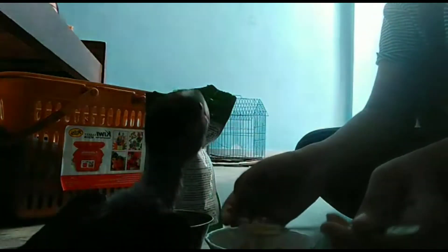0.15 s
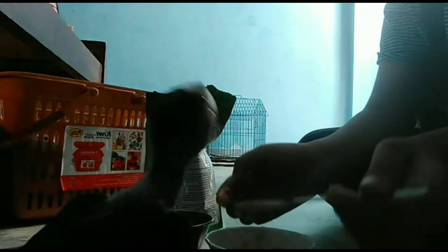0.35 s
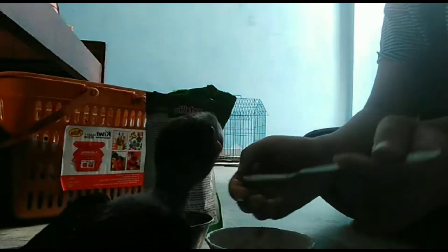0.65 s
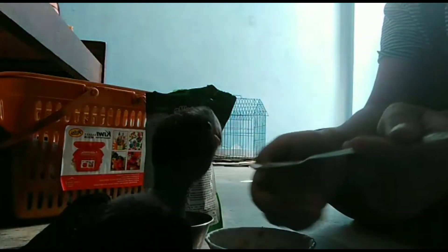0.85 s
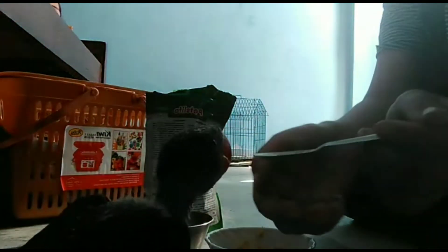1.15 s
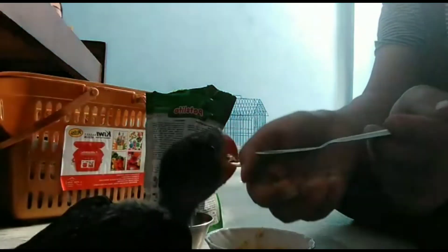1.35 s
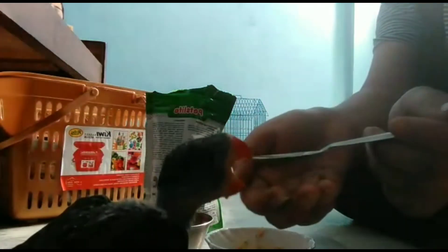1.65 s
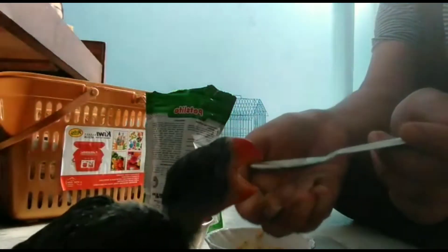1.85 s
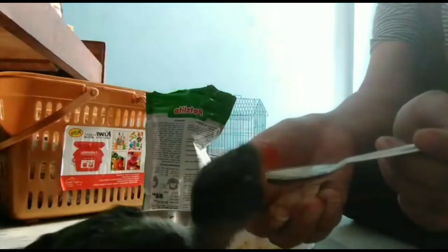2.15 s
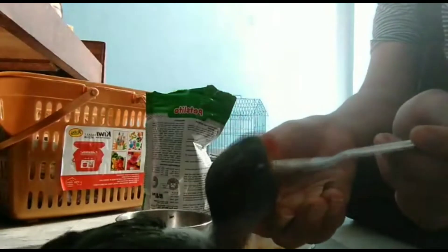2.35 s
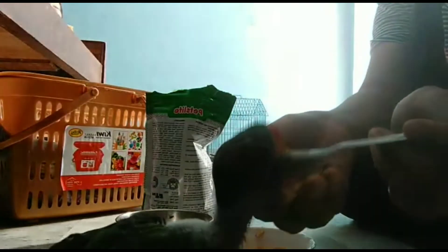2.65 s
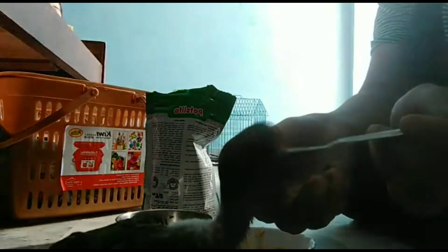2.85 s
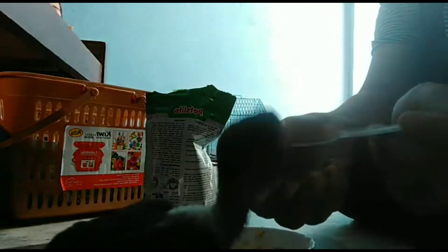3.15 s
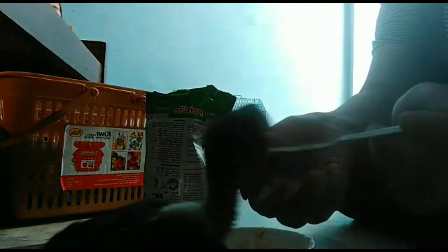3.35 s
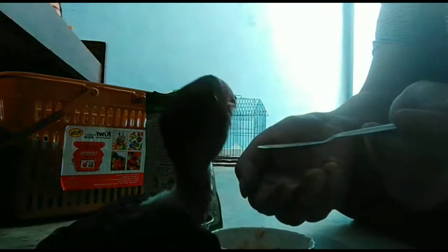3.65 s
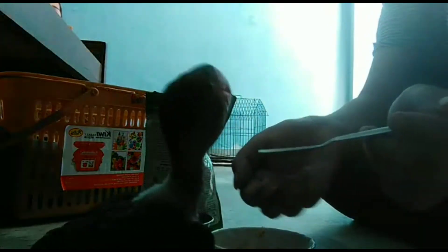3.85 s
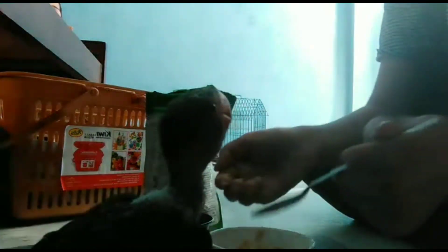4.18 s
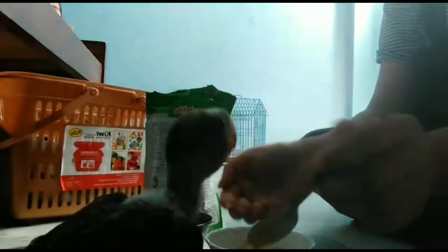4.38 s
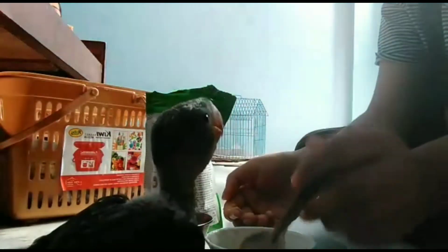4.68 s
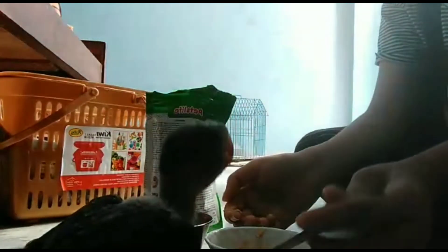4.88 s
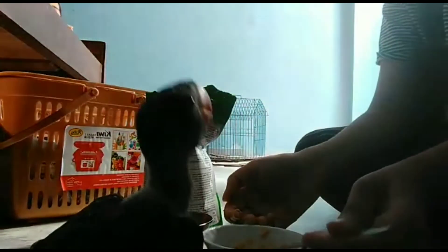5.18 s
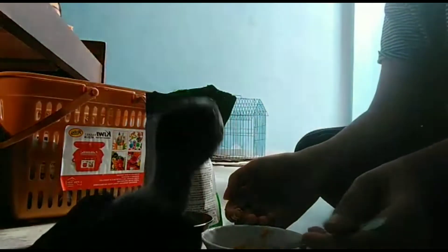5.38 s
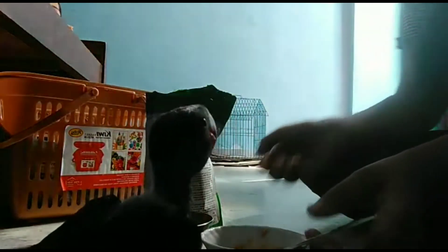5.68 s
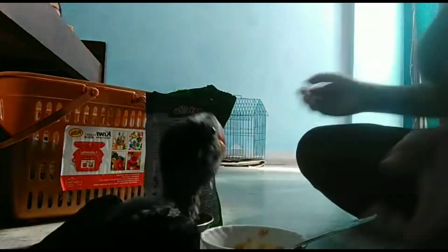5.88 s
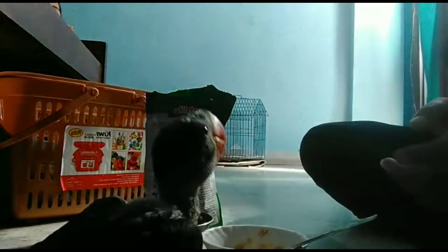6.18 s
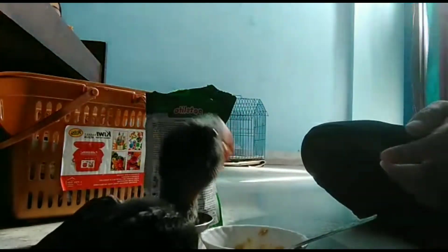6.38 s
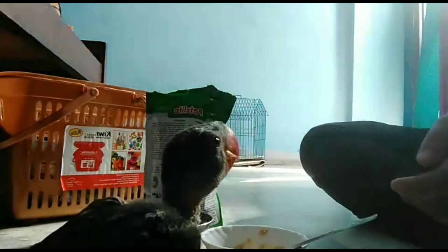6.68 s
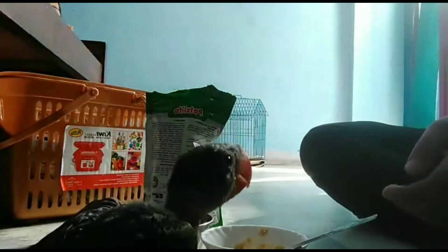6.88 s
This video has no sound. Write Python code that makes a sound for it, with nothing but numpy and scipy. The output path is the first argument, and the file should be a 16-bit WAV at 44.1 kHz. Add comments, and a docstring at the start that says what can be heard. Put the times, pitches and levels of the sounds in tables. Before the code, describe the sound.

A parrot chick close to the microphone ends one rasping squawk, then soon gives another, shrill and harsh, dropping in pitch. Its beak ticks lightly against a metal spoon. The spoon scrapes briefly, and the chick squawks once more, with tiny croaks before and after. Soft brushing of feathers and a sleeve follows. Dull floor bumps, low shuffling and faint background noise run underneath in a small, slightly echoing room.

```python
"""The rasping tail of a parrot chick's squawk, then two whole squawks, in a small quiet room.
Its syrinx buzzes through throat and beak: a clear arch breaks into a rasp as the pitch steps down.
Short croaks surround the last call. The chick is spoon-fed: the beak ticks, the spoon rings and
scrapes, feathers and sleeves brush. Dull floor bumps, shuffling rumble and room noise lie beneath;
rumble, rubbing, room noise and echo sink under each call."""
import sys
import numpy as np
from scipy import signal
from scipy.fft import rfft, irfft, next_fast_len
from scipy.io import wavfile
from scipy.ndimage import uniform_filter1d

SR = 44100
rng = np.random.default_rng(int(sys.argv[2]) if len(sys.argv) > 2 else 0)


def pcm_store(signal):
    """Save signal as 16-bit PCM."""
    levels = np.round(np.clip(np.atleast_2d(signal), -1, 1) * 32767)
    wavfile.write(sys.argv[1], SR, levels.astype(np.int16).T)


N = 310009
TIME = np.arange(N) / SR
CUTOFF_HZ = 15650

# squawks: start_s, break_s, end_s, crest_hz, break_hz, fall_octaves_per_s, step_s
SQUAWKS = [(-.3, -.167, .072, 1650, 1590, 3.19, .04), (1.688, 1.85, 2.068, 1712, 1560, 3.35, .0422),
           (5.16, 5.294, 5.532, 1638, 1579, 3.0, .0402)]
# force of each squawk: time_s, level_db, fundamental_share_db, shrill_share_db
FORCE_FIRST = [(0.0, -13, -17, -1), (0.024, -22, -15.5, -6.5), (0.058, -17, -10.5, -4.5),
               (0.072, -33.5, -13.5, -13)]
FORCE_SECOND = [(1.69, -26.5, -7.5, -10.5), (1.7, -18.5, -3, -14.5), (1.726, -14, -14.5, -3.5),
                (1.838, -16, -10.5, -6.5), (1.918, -24, -4, -8), (1.96, -18, -29, -6),
                (1.986, -21, -11, -7), (2.046, -19, -16.5, -8), (2.066, -27, -1.5, -14)]
FORCE_THIRD = [(5.162, -30, 0, -12), (5.19, -15.5, -10, -6), (5.292, -14, -25.5, -1),
               (5.306, -20.5, -1.5, -8), (5.326, -14, -17, -4.5), (5.338, -18.5, -4.5, -4.5),
               (5.4, -24, -11, -4.5), (5.514, -17, -12.5, -3.5), (5.53, -29, 1.5, -16)]
# throat and beak response per posture: freq_hz, gain_db
THROAT_OPEN = [(2200, -21.5), (3100, -9.5), (3750, -16.5), (4250, -8.5), (5200, -22.5), (6400, -25),
               (7500, -14), (8500, -24.5), (10000, -42.5), (15000, -52.5)]
THROAT_STRETCHED = [(2300, -23.5), (3200, -23), (3850, -13.5), (4400, -21.5), (5050, -17.5), (5500, -31.5),
                    (6000, -16), (6750, -22.5), (7400, -38.5), (8150, -17), (10300, -40), (11600, -37.5),
                    (12800, -50.5), (15000, -42)]
THROAT_UPRIGHT = [(2400, -22.5), (3200, -14.5), (4200, -15.5), (4850, -14), (5600, -26), (6300, -15.5),
                  (7000, -37), (7900, -19.5), (8800, -29.5), (9600, -40.5), (10400, -52), (11300, -48.5),
                  (12300, -52.5), (14700, -51.5)]
# croaks: start_s, level_db, hold_s
CROAKS = [(5.063, -42, .006), (5.111, -40, .004), (5.126, -31, .007), (5.683, -35, .021),
          (5.734, -32, .004), (5.744, -27, .009), (5.764, -35, .011)]
# croak spectrum: freq_hz, gain_db
CROAK_COLOUR = [(880, -51), (1500, -20), (1920, 0), (2090, -12.5), (2640, -30.5), (2830, -1), (2970, 5.5),
                (3870, -24), (4890, -10.5), (6750, -21), (7820, -4), (9420, -17), (10300, -27.5),
                (11100, -26), (15500, -30.5)]
# beak clicks and duller knocks: start_s, peak_db, centre_hz, decay_s
TICKS = [(2.986, -49, 7650, .002), (3.292, -13, 8800, 0.0004), (3.4867, -17, 6840, 0.0011),
         (3.4922, -32, 7500, .003), (3.951, -22, 440, 0.0068), (4.057, -26, 446, 0.0068),
         (4.9358, -26.5, 1950, 0.0065)]
# beak taps on the spoon: start_s, level_db
SPOON_TAPS = [(2.984, -45), (3.066, -54), (3.102, -58), (3.118, -56), (3.2052, -50), (3.294, -40),
              (3.4876, -39)]
# tapped spoon's modes: freq_hz, gain_db, t60_s
SPOON_MODES = [(4050, -5, .06), (8550, 1, .04), (8980, 2, .055), (11700, -2, .04), (13600, -7, .04),
               (15300, -18, .03)]
# spoon's sliding: time_s, level_db
SCRAPE_LEVEL = [(4.93, -74), (4.955, -54.5), (4.972, -41.5), (4.985, -55), (5.003, -48), (5.04, -55),
                (5.14, -44), (5.17, -73)]
# sliding spoon's resonances: centre_hz, width_hz, gain_db
SCRAPE_MODES = [(3070, 180, 0), (5100, 240, -3), (5830, 180, 0), (7750, 400, 4), (11000, 4000, -6)]
# feather and hand scuffs: start_s, peak_s, end_s, peak_db
SCUFFS = [(1.049, 1.119, 1.197, -41.5), (5.014, 5.105, 5.23, -40.5), (5.574, 5.756, 5.91, -46.5),
          (5.973, 6.101, 6.135, -48.5)]
# sleeve's slide: time_s, level_db
SLEEVE_LEVEL = [(5.85, -54), (5.916, -59.5), (6.002, -49.5), (6.078, -50.5), (6.198, -57.5), (6.324, -83),
                (6.508, -70.5), (6.688, -87), (6.7, -84.5)]
# scuff and sleeve spectra: freq_hz, gain_db
SCUFF_COLOUR = [(1650, -42.5), (2800, -4), (2970, -2.5), (3140, -16.5), (3280, -17), (4960, -8),
                (6710, -15), (7960, -7), (11200, -31.5), (14100, -33.5), (15500, -32.5)]
SLEEVE_COLOUR = [(3530, -21), (6000, -17), (6140, -13), (7090, -8), (7740, 2.5), (9400, -1.5), (11800, -16),
                 (15500, -14)]
# bumps through the floor: start_s, relative_db, pitch_hz
BUMPS = [(0.14, -21, 83), (0.625, -14.5, 99), (1.156, -16.5, 96), (1.227, -19.5, 90), (1.306, -14, 82.6),
         (1.328, -14.5, 101), (1.58, -23, 91), (2.27, -22, 82.5), (3.134, -15, 135), (3.183, -11, 131),
         (3.29, -9, 94), (3.895, -17, 124), (3.938, -8.5, 125), (3.983, -19, 195), (4.135, -17.5, 85),
         (4.318, -15, 85), (4.822, -19, 85.5), (4.946, -18.5, 91), (5.524, -11, 90), (5.648, -9.5, 127),
         (5.661, -18, 90), (5.765, -15, 102), (5.889, -14, 103), (5.951, -14, 119), (6.175, -21, 110),
         (6.215, -19, 142), (6.496, -14, 91)]
# bird and hands shuffling near the microphone: start_s, end_s, rumble_db, rub_db
SHUFFLES = [(.1, 0.19, -40, -46), (0.622, 0.706, -32, -44.5), (0.935, 1.367, -40, -51),
            (1.633, 1.66, -43, -49), (2.708, 3.1, -41, -43.5), (2.933, 2.982, -39.5, -35),
            (3.13, 3.486, -36, -33.5), (3.837, 4.153, -33.5, -34), (3.952, 3.963, -31, -26.5),
            (4.8, 5.206, -36, -43.5), (5.09, 5.15, -37.5, -43), (5.439, 5.831, -32, -41.5),
            (5.646, 5.713, -23, -44), (5.885, 5.912, -31.5, -36.5), (6.16, 6.288, -38.5, -46),
            (6.441, 6.514, -31, -39.5), (6.791, 7.036, -29.5, -39.5)]
# rumble, rubbing and room noise spectra: freq_hz, gain_db
RUMBLE_COLOUR = [(20, -30), (35, -12), (55, -5.5), (75, 2.5), (105, 5.5), (135, -4), (200, -16), (280, -21)]
RUB_COLOUR = [(160, 7), (230, 4), (310, 0.5), (390, -4), (490, -3.5), (600, -16), (760, -20)]
AIR_COLOUR = [(290, 3), (390, 1), (490, 6), (600, -2.5), (800, -0.5), (1050, -3), (1400, -13.5),
              (1900, -4.5), (2450, -13), (3000, -31), (3500, -34), (4100, -25), (4900, -44), (7900, -44),
              (9000, -57), (15500, -54.5)]
# background dip during and after the second squawk: time_s, gain_db
LULL = [(1.69, 4), (1.75, -13.5), (2.0, -8.5), (2.12, -12.5), (2.22, -17.5), (2.3, -10), (2.42, -10),
        (2.47, -2.5), (2.53, -1.5)]
# room decay: freq_hz, t60_s
ROOM_T60 = [(800, .4), (3000, 0.34), (8000, 0.23), (15000, .28)]


def squawk(call, force, throat, throb_hz=270, flutter_db=2.6, rolloff_db=.7):
    """The syrinx buzzes through throat and beak; when rough, a throb shakes it and air rasps through."""
    quiver, jitter, lurch, shimmer, rasp = .003, .006, .015, .65, .28
    start_s, _, end_s, *_ = call
    t = np.arange(max(start_s, 0), end_s, 1 / SR)
    n = len(t)
    pitch_hz, rough = syrinx(t, *call)
    level_db, fundamental_db, shrill_db = in_time(force, t)
    pitch_hz = uniform_filter1d(pitch_hz, size=200) * (1 + quiver * wobble(76, n))
    # the throb bends cycle length and strength: sidebands
    throb = np.sin(2 * np.pi * np.cumsum(throb_hz * (1 + .25 * wobble(49, n))) / SR)
    bend = rough * (lurch * throb + jitter * wobble(290, n))
    phase = 2 * np.pi * np.cumsum(pitch_hz * (1 + bend)) / SR
    k = np.arange(1, 19)[:, None]
    partial_hz = k * pitch_hz
    sway = np.array([wobble(30, n) + 2 * rough * wobble(150, n) for _ in k])
    gain = from_db(at_hz(throat, partial_hz) + flutter_db * sway - rolloff_db * np.maximum(k - 10, 0))
    gain *= np.clip((CUTOFF_HZ - partial_hz) / 400, 0, 1)
    # the gape splits the power: fundamental, middle, shrill top
    shrill = np.clip((partial_hz - 7000) / 400, 0, 1)
    bands = [k == 1, (k > 1) * (1 - shrill), shrill]
    low, high = from_db(fundamental_db) ** 2, from_db(shrill_db) ** 2
    shares = [low, np.clip(1 - low - high, .25, 1), high]
    gain = sum(gain * band * np.sqrt(share / np.sum((gain * band) ** 2, axis=0))
               for band, share in zip(bands, shares))
    gain *= 1 + shimmer * rough * throb * np.minimum(k / 4, 1)
    tone = np.sqrt(2) * np.sum(gain * np.sin(k * phase + rng.uniform(0, 2 * np.pi, k.shape)), axis=0)
    # one puff a cycle; air takes over as the call collapses
    puffs = coloured(rng.standard_normal(n) * (1 + np.cos(phase)), throat)
    airy = np.clip(rasp * rough ** 2 + .5 * rough ** 6, 0, .9)
    fade = np.clip(np.minimum(t - t[0], t[-1] - t) / .004, 0, 1)
    envelope = from_db(level_db + .6 * wobble(45, n)) * fade
    out = np.zeros(N)
    add(out, t[0], envelope * (np.sqrt(1 - airy ** 2) * tone + airy * puffs))
    return out


def syrinx(t, start_s, break_s, end_s, crest_hz, break_hz, fall_octaves_per_s, step_s):
    """Pitch and roughness (0-1): scoop up, lift, sag, fall in rough steps, collapse."""
    scoop_s, lift_s, step_fade_s, droop_s = .048, .016, .18, .016
    step_octaves, droop_octaves = .05, .16
    rough_clear, rough_broken, rough_per_s, rough_step = .03, .23, .75, .17
    catch_s, collapse_s = .011, .015
    crest_s = start_s + .075
    scoop = .16 * np.maximum(1 - (t - start_s) / scoop_s, 0) ** 2
    lift = .038 * np.clip((crest_s - t) / lift_s, 0, 1)
    sag_hz = (crest_hz - break_hz) * np.clip((t - crest_s) / (break_s - crest_s), 0, 1) ** 2
    arch_hz = crest_hz * (1 - scoop - lift) - sag_hz
    falling_s = np.maximum(t - break_s, 0)
    step_phase = 2 * np.pi * falling_s / step_s
    steps = step_octaves * np.exp(-falling_s / step_fade_s) * np.sin(step_phase)
    droop = droop_octaves * np.exp((t - end_s) / droop_s)
    pitch_hz = arch_hz * 2 ** -(fall_octaves_per_s * falling_s + steps + droop)
    broken = rough_broken + rough_per_s * falling_s + rough_step * np.cos(step_phase)
    edges = np.exp((start_s - t) / catch_s) + np.exp((t - end_s) / collapse_s)
    return pitch_hz, np.clip(rough_clear + np.minimum(step_phase, 1) * broken + edges, 0, 1)


def croaks(flap_hz=330, attack_s=.00095, decay_s=.0017):
    """Slow, uneven flaps of the syrinx, each a burst of noise."""
    flap_cycle = np.cumsum(flap_hz * (1 + .36 * wobble(200, N))) / SR % 1
    grain = coloured(rng.standard_normal(N) * np.exp(-3.5 * flap_cycle), CROAK_COLOUR)
    envelope, t = np.zeros(N), TIME[:SR // 10]
    for start_s, level_db, hold_s in CROAKS:
        shape = np.minimum(t / attack_s, 1) * np.exp(-np.maximum(t - hold_s, 0) / decay_s)
        add(envelope, start_s, from_db(level_db) * shape)
    return grain * envelope


def ticks(edge_ratio=1.1):
    """Beak clicks and knocks: one narrow-band snap each."""
    out, t = np.zeros(N), TIME[:SR // 15]
    for start_s, peak_db, hz, decay_s in TICKS:
        burst = rng.standard_normal(len(t)) * np.exp(-t / decay_s)
        body = bandpass(burst, hz / edge_ratio, min(hz * edge_ratio, CUTOFF_HZ), order=1)
        contact = signal.butter(2, min(3 * hz, CUTOFF_HZ), fs=SR, output="sos")
        snap = signal.sosfilt(contact, body)
        add(out, start_s, from_db(peak_db) * snap / np.abs(snap).max())
    return out


def spoon_taps(scatter_db=4.5):
    """The beak taps the spoon, striking each mode with a random strength."""
    out = np.zeros(N)
    tap_s, tap_db = np.transpose(SPOON_TAPS)
    for hz, gain_db, t60_s in SPOON_MODES:
        strike_db = tap_db + gain_db + scatter_db * rng.standard_normal(len(tap_s))
        clicks = np.zeros(N)
        clicks[(tap_s * SR).astype(int)] = from_db(strike_db)
        out += ring(clicks, hz, t60_s)
    return out


def spoon_scrape():
    """The spoon is laid down: uneven friction excites its resonances."""
    friction = rng.standard_normal(N) * from_db(3 * wobble(70, N))
    body = sum(from_db(gain_db) * rms_one(bandpass(friction, hz - width_hz / 2, hz + width_hz / 2))
               for hz, width_hz, gain_db in SCRAPE_MODES)
    return gain_curve(SCRAPE_LEVEL) * rms_one(body)


def brushing(edge_db=24, grain_db=2.5, sleeve_db=-2):
    """Scuffs of feathers and hands swell and fade; a sleeve slides past."""
    swell = sum(gain_curve([(start_s, db - edge_db), (peak_s, db), (end_s, db - edge_db)])
                for start_s, peak_s, end_s, db in SCUFFS)
    scuffs = swell * noise(SCUFF_COLOUR) * from_db(grain_db * wobble(180, N))
    sleeve = gain_curve(SLEEVE_LEVEL) * from_db(sleeve_db) * noise(SLEEVE_COLOUR)
    return scuffs + sleeve


def floor_bumps(swing_tau_s=.0036, gain_db=-3, highpass_hz=58):
    """Soft knocks through the floor swing for a few slow cycles."""
    out, t = np.zeros(N), TIME[:SR // 8]
    swing = (t / swing_tau_s) ** 2 * np.exp(-t / swing_tau_s)
    swing /= swing.max()
    for start_s, relative_db, pitch_hz in BUMPS:
        tone = np.sin(2 * np.pi * (pitch_hz * t + rng.random()))
        add(out, start_s, from_db(relative_db + gain_db) * swing * tone)
    return signal.sosfilt(signal.butter(3, highpass_hz, "high", fs=SR, output="sos"), out + 1e-18)


def shuffling(dip_db, rumble_rest_db=-41, rub_rest_db=-56, attack_s=.013, release_s=.049):
    """Bird and hands shuffle: lumpy rumble and rubbing swell above a resting level."""
    rumble_power, rub_power = from_db(rumble_rest_db) ** 2, from_db(rub_rest_db) ** 2
    for start_s, end_s, rumble_db, rub_db in SHUFFLES:
        before_s, after_s = np.maximum(start_s - TIME, 0), np.maximum(TIME - end_s, 0)
        envelope = np.exp(-before_s / attack_s - after_s / release_s)
        rumble_power += (from_db(rumble_db) * envelope) ** 2
        rub_power += (from_db(rub_db) * envelope) ** 2
    rumble = from_db(2.95 * wobble(13, N) + .77 * dip_db) * noise(RUMBLE_COLOUR)
    rub = from_db(2.4 * wobble(40, N) + dip_db) * noise(RUB_COLOUR)
    return np.sqrt(rumble_power) * rumble + np.sqrt(rub_power) * rub


def room_echo(x, build_s=.025):
    """Reflections off bare walls thicken, then die, faster in the treble."""
    t, edges_hz, tail = TIME[:SR * 2 // 3], np.geomspace(500, CUTOFF_HZ, 8), 0
    for low, high in zip(edges_hz, edges_hz[1:]):
        t60_s = at_hz(ROOM_T60, np.sqrt(low * high))
        tail += bandpass(rng.standard_normal(len(t)), low, high) * from_db(-60 * t / t60_s)
    tail *= np.minimum(t / build_s, 1)
    return signal.fftconvolve(x, tail / np.sqrt(np.sum(tail ** 2)))[:N]


def room_noise(dip_db, level_db=-41, waver_db=2.5):
    """Soft noise whose bands waver independently."""
    edges_hz = [250, 560, 850, 1300, 1800, 2300, 3000, CUTOFF_HZ]
    bands = sum(bandpass(rng.standard_normal(N), low, high) * from_db(waver_db * wobble(7, N))
                for low, high in zip(edges_hz, edges_hz[1:]))
    return from_db(level_db + dip_db) * coloured(bands, AIR_COLOUR)


def whine(pitch_hz=7730, level_db=-80.5, t60_s=.014):
    """A thin whine: noise twice through a narrow resonance."""
    narrow = ring(rng.standard_normal(N), pitch_hz, t60_s)
    return from_db(level_db) * rms_one(ring(narrow, pitch_hz, t60_s))


def ducking_db(x, threshold_db, response_s, slope=.98):
    """Gain reduction that follows the level of x above the threshold."""
    level_db = 10 * np.log10(np.maximum(uniform_filter1d(x ** 2, size=400), 1e-12))
    pole = np.exp(-1 / (response_s * SR))
    return signal.lfilter([1 - pole], [1, -pole], slope * np.maximum(level_db - threshold_db, 0))


def from_db(db):
    """Decibels to gain."""
    return 10 ** (np.asarray(db) / 20)


def rms_one(x):
    """Scale to unit rms."""
    return x / np.sqrt(np.mean(x ** 2) + 1e-20)


def in_time(rows, t):
    """Columns of a curve at times t."""
    time_s, *columns = np.transpose(rows)
    return [np.interp(t, time_s, column) for column in columns]


def gain_curve(rows):
    """Gain from (time_s, level_db) rows; silent outside them."""
    return from_db(np.interp(TIME, *np.transpose(rows), -np.inf, -np.inf))


def at_hz(points, hz):
    """Read a curve on a log-frequency axis."""
    freq_hz, value = np.transpose(points)
    return np.interp(np.log(hz + 1e-3), np.log(freq_hz), value)


def bandpass(x, low_hz, high_hz, order=2):
    """Keep one band of x."""
    return signal.sosfilt(signal.butter(order, [low_hz, high_hz], "band", fs=SR, output="sos"), x)


def coloured(x, spectrum, skirt_db_per_octave=40):
    """Filter x by a spectrum that falls off beyond its ends; rms 1."""
    size = next_fast_len(len(x))
    hz = np.arange(size // 2 + 1) * SR / size + .0015
    outside_octaves = np.abs(np.log2(hz / np.clip(hz, spectrum[0][0], spectrum[-1][0])))
    gain = from_db(at_hz(spectrum, hz) - skirt_db_per_octave * outside_octaves)
    return rms_one(irfft(rfft(x, size) * gain, size)[:len(x)])


def noise(spectrum):
    """Steady coloured noise, rms 1."""
    return coloured(rng.standard_normal(N), spectrum)


def wobble(hz, size):
    """Random motion slower than hz, rms 1."""
    run_in = SR // 4
    lowpass = signal.butter(2, hz, fs=SR, output="sos")
    return rms_one(signal.sosfilt(lowpass, rng.standard_normal(size + run_in))[run_in:])


def ring(x, hz, t60_s):
    """Resonator: a unit click starts a decaying sine of height 1."""
    r, w = from_db(-60 / (t60_s * SR)), 2 * np.pi * hz / SR
    return signal.lfilter([0, np.sin(w)], [1, -2 * r * np.cos(w), r * r], x + 1e-18)


def add(out, start_s, sound):
    """Mix a sound in at start_s."""
    i = max(round(start_s * SR), 0)
    out[i:i + len(sound)] += sound[:N - i]


def scene():
    """Chick close by, small noises around it, room behind; calls duck the echo and background."""
    forces = FORCE_FIRST, FORCE_SECOND, FORCE_THIRD
    throats = THROAT_OPEN, THROAT_STRETCHED, THROAT_UPRIGHT
    chick = sum(squawk(call, force, throat) for call, force, throat in zip(SQUAWKS, forces, throats))
    small = croaks() + ticks() + spoon_taps() + brushing() + spoon_scrape()
    direct = chick + small
    echo_db = -14 - ducking_db(direct, threshold_db=-28, response_s=.0051)
    echo = from_db(echo_db) * room_echo(chick + from_db(3) * small)  # small noises: farther, more room
    lull_db = np.interp(TIME, *np.transpose(LULL), 0, 0)
    dip_db = lull_db - ducking_db(direct, threshold_db=-31.5, response_s=.088)
    return (direct + echo + floor_bumps() + shuffling(dip_db) + room_noise(dip_db) + whine())[None]


def record(dry):
    """Steep treble cut."""
    return signal.sosfilt(signal.ellip(12, .1, 80, CUTOFF_HZ, fs=SR, output="sos"), dry)


dry = scene()
out = record(dry)
pcm_store(out)
```